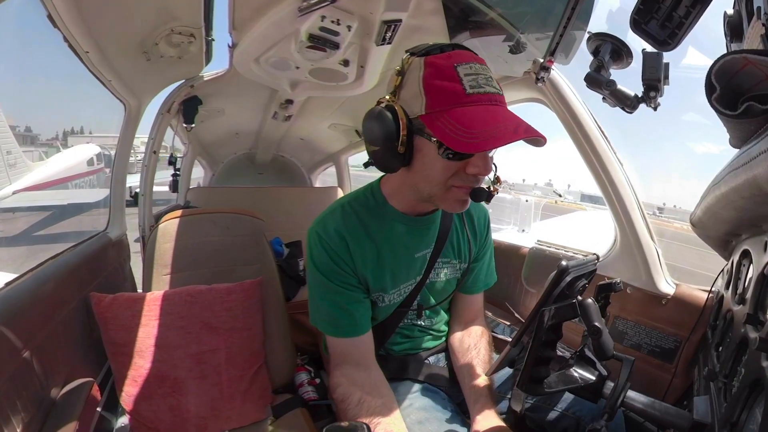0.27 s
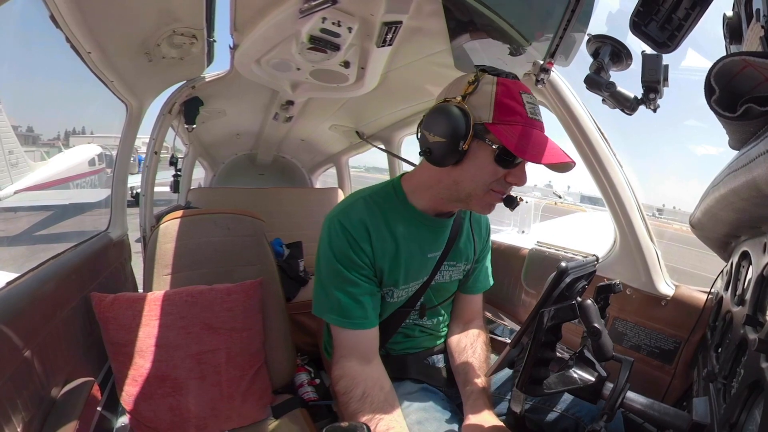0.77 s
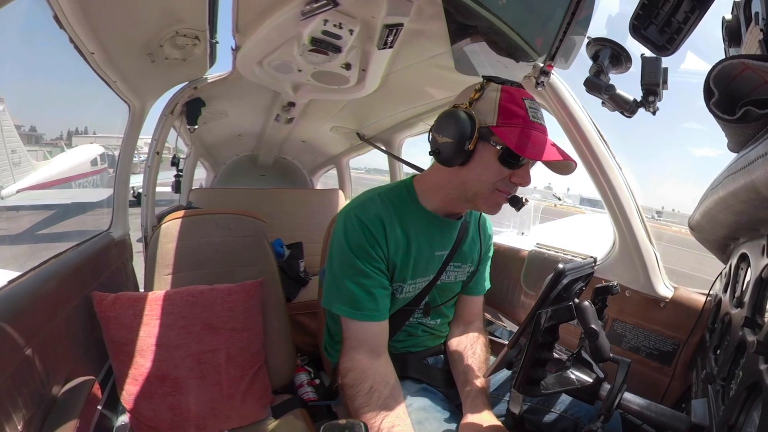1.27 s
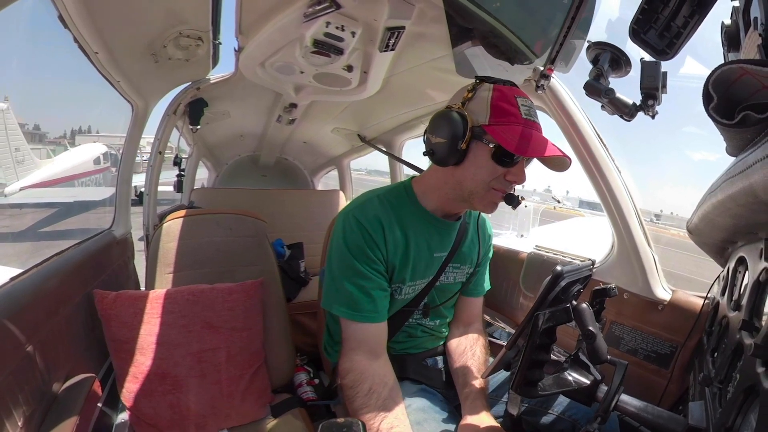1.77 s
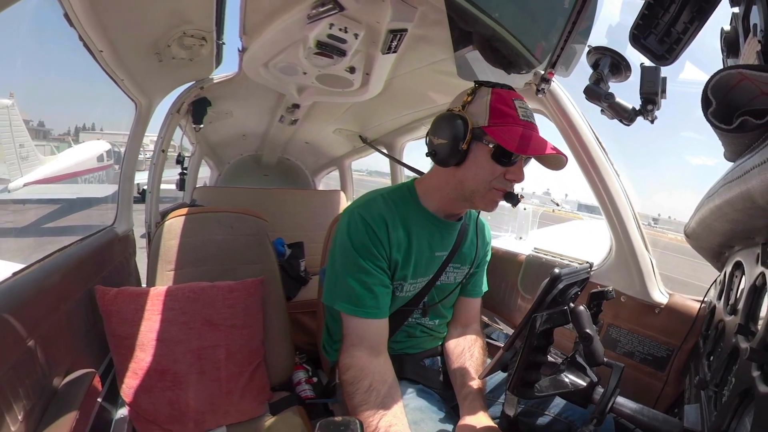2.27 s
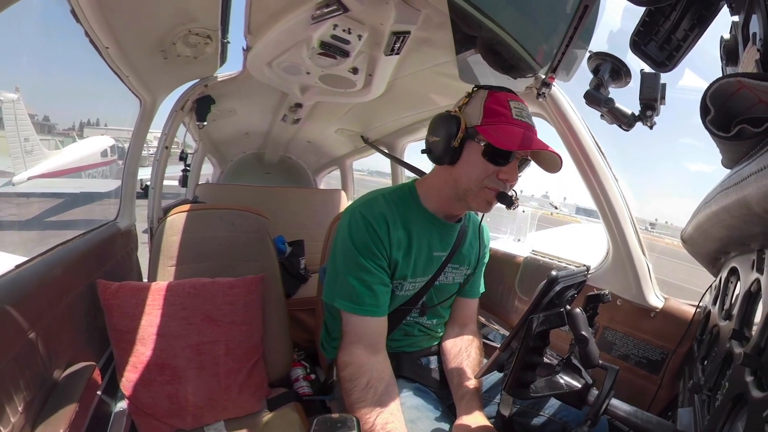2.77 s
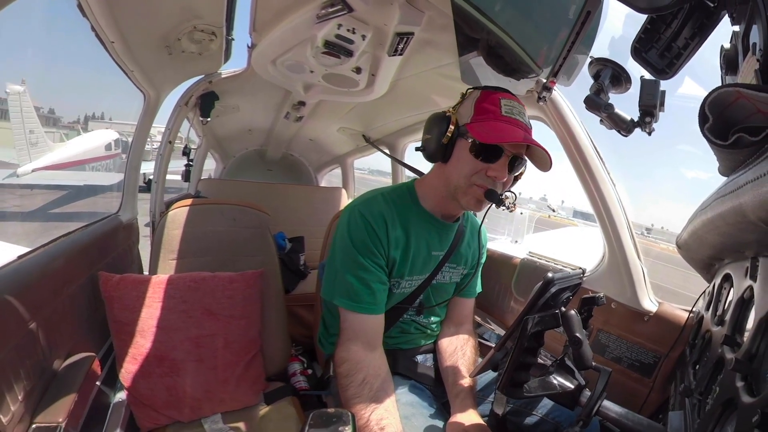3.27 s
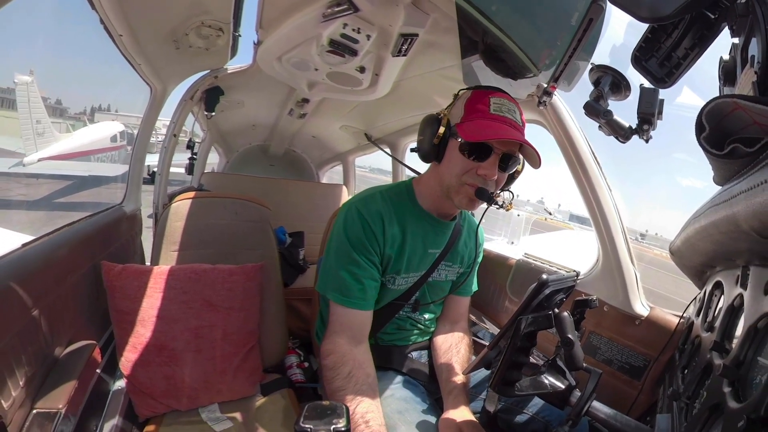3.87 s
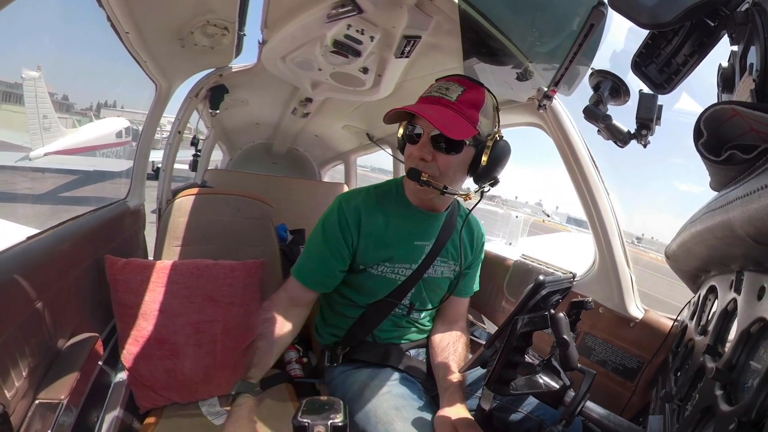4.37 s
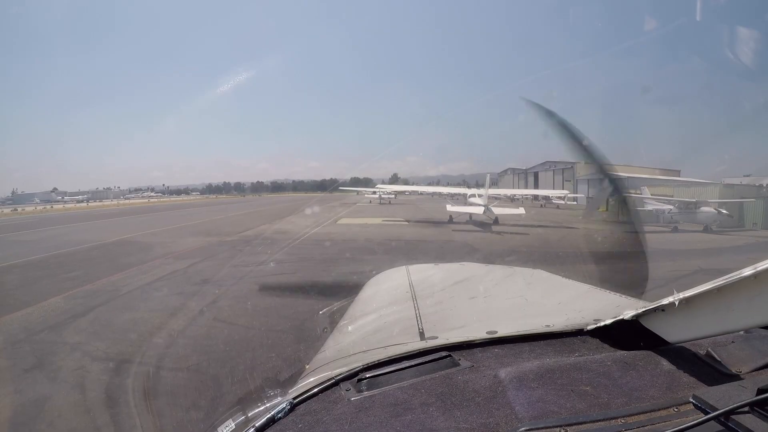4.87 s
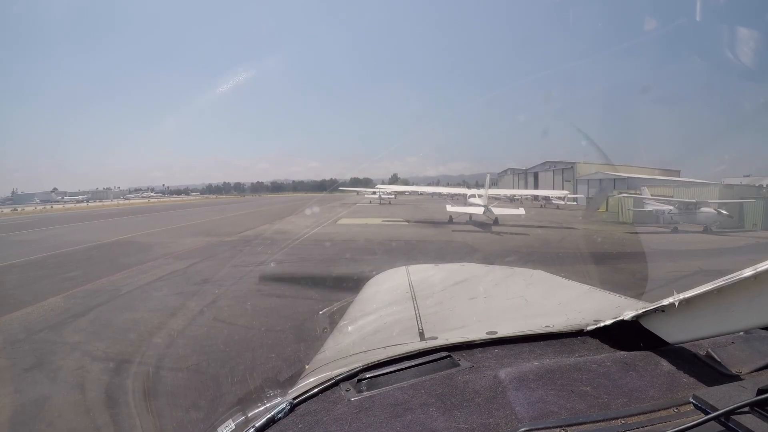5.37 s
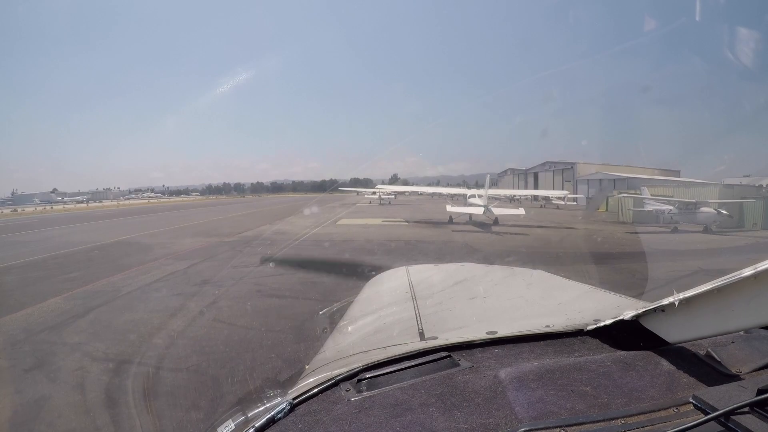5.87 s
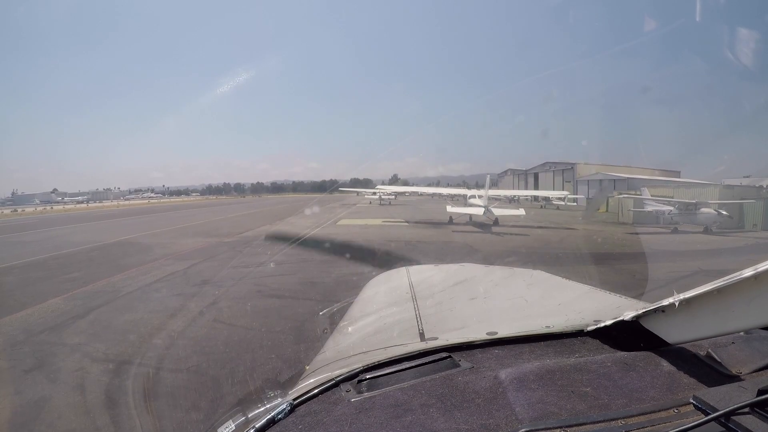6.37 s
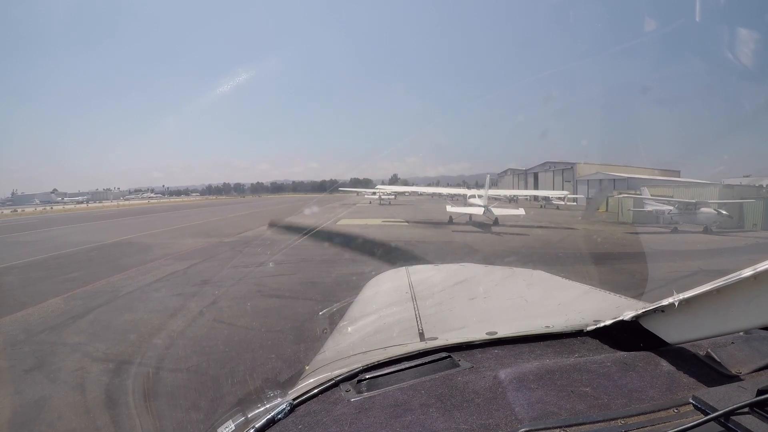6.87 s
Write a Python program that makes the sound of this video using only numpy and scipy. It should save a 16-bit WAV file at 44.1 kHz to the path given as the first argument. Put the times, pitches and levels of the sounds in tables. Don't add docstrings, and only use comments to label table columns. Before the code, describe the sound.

From 0 s a small four-cylinder aircraft engine is already running, heard inside the tight cabin by an overloaded microphone. Around 45 firings a second blend into a rough, fluttering drone: deep bass boom, midrange panel roar, hollow metallic ringing and low propeller buffeting. A thin high hiss pulses once per turn, about 21 times a second. A tiny skip comes at 1.2 s; from then to about 2.7 s the speed sinks slightly into a lumpy idle, its bass wavering. A brief gap interrupts at 3.2 s and a longer dropout at 4.24 s, returning instantly. From about 4.9 s a gusty, breathy draught rises, with a faint tick near 5.2 s and slightly duller treble. At 5.7 s an abrupt cut makes everything louder and slightly faster, with strong rattling and a small click near 6.15 s. Draught and rattle ease after 6.9 s; it ends abruptly around 7.1 s.

```python
import sys
import numpy as np
from scipy import signal
from scipy.fft import rfft, irfft, next_fast_len
from scipy.io import wavfile
from scipy.ndimage import uniform_filter1d, map_coordinates

SR = 44100
rng = np.random.default_rng(int(sys.argv[2]) if len(sys.argv) > 2 else 0)


def gain_from_decibels(decibels):
    exponent = np.asarray(decibels, float) / 20
    return 10 ** exponent


def transcribe(signal):
    frames = np.atleast_2d(signal).T
    limited = np.clip(frames, -1, 1)
    pcm = np.round(limited * 32767).astype(np.int16)
    wavfile.write(sys.argv[1], SR, pcm)


N = 313551

# start_s, speed_rpm
SHAFT_SPEED = [(0.0, 1375.9), (0.6, 1387.1), (1.2, 1384.0), (1.8, 1300.7), (2.7, 1266.7), (3.0, 1254.2),
               (4.2, 1250.5), (4.5, 1258.0), (4.8, 1250.3), (5.1, 1262.6), (5.4, 1252.9), (5.7, 1288.7),
               (6.3, 1283.2), (6.6, 1290.6), (7.11, 1280.8)]
# start_s, silence_s, fade_in_s, skipped_turns, cut_swing (sample value), return_swing (sample value)
JUMPS = [
    (1.18095, .0015, .004, .0375, -.17, 0),
    (3.18295, .006, .006, .0125, .5, 0),
    (4.23865, .0213, .0001, -.4325, .3, .36),
    (5.68545, -1, .0001, .4475, 0, 0),
]
ORDER_LEADS = [
    (1, .45, -.1),
    (2, .27, -.22),
    (4, 0, 0),
    (6, -.02, .12),
]
# shaft_order, level_db (over the wash)
WEAK_ORDERS = [(3, 2.5), (5, -13.5), (7, -12.5), (8, -10), (9, -13), (10, -7), (11, -15.5), (12, -12.5),
               (14, -19.5)]
# pitch_hz, level_db (per Hz)
WASH_COLOUR = [(30, -29.5), (50, -1), (70, -10), (110, -9.5), (150, -8), (190, -13.5), (240, -18.5),
               (330, -30), (600, -63), (1200, -120)]
# pitch_hz, level_db (per Hz)
ROAR_COLOUR = [(140, -27.5), (240, -2), (340, 0.5), (450, 1), (600, -5), (830, -3), (1200, -11.5),
               (1600, -15), (2100, -20), (2700, -22), (3300, -26), (3900, -31), (4600, -41), (7000, -100)]
# pitch_hz, level_db (per Hz)
HISS_COLOUR = [(2500, -40), (3800, -14), (4400, -11), (4900, -4), (5500, 0), (6400, -5), (7300, -6),
               (7900, -12), (8600, -19.5), (10000, -22.5), (11000, -19), (13000, -19), (15000, -22)]
# pitch_hz, width_hz, level_db
PANEL_MODES = [(626, 82, -2.5), (924, 39, -3), (1075, 17, -3.5), (1332, 72, -4.5), (1700, 17, -12),
               (1897, 60, -3), (2800, 640, -14)]
CYLINDER_DB = [-.8, 0, .8, -.3]
# pitch_hz, width_hz, level_db, shaft_angle_turns, sharpness (ratio)
WHISTLE_BANDS = [
    (14500, 1000, -4, .19, .95),
    (13600, 1000, -3.5, .25, .85),
    (12600, 1000, -2, .36, .4),
    (12000, 900, 0, .46, .35),
]
# pitch_hz, level_db (per Hz)
DRAUGHT_COLOUR = [(150, -42), (400, 6.5), (1200, 0.5), (2500, 4.5), (3400, -9), (4300, 4), (5200, -1),
                  (7000, -11), (9000, -29), (12000, -47)]
# pitch_hz, level_db, shaft_angle_turns, beat_depth_db
RINGING_PANELS = [
    (822, 0, 1.2, 3.8),
    (610, -7, 1.05, 4),
    (690, -12, .5, 3),
    (1070, -17, 1.6, 2),
    (1580, -19, 1.3, 3),
]
# pitch_hz, level_db (per Hz)
BUFFET_COLOUR = [(4, -16), (12, -4), (20, 0), (32, 0), (42, -8), (60, -40), (120, -120)]
# start_s, vent_opening (0-1), panel_rattle_db
CABIN_STATE = [(0, 0.15, -0.5), (.9, 0.16, 2), (1.3, 0.1, 1), (1.8, 0, 0), (3.1, 0.08, 2), (3.7, 0.1, -1),
               (4.2, 0.11, 0.5), (4.55, .05, -1), (4.85, 0.45, -2), (5.15, 0.91, 3), (5.45, 0.98, 6),
               (5.68, 1, 5), (5.9, 0.9, 8), (6.15, .8, 5.5), (6.5, 0.94, 4.5), (6.9, 0.5, -1.5),
               (7.11, 0.5, -6)]
# idle_db, faster_db (per 100 rpm), vent_db (fully open), louder_db (once the scene changes)
ORDER_LEVELS = [
    (-19, 1, 2, 3),
    (-21, 4, 2.5, 4.5),
    (-15.5, -4.5, .5, 3.5),
    (-21.5, -2, -.5, 7),
]
WASH_LEVEL = (-31.5, 2.5, 3, 4)
ROAR_LEVEL = (-31.5, 1, 4.5, 2.5)
HISS_LEVEL = (-55.5, 1.5, 0.8, 4.5)
WHISTLE_LEVEL = (-59.5, -2.5, -3, 4)
DRAUGHT_LEVEL = (-75.5, 0, 27.5, 2)
RING_LEVEL = (-36.5, -0.2, .1, 1.2)
# centre_s, firing_order_db, shaft_order_db
GUST_LURCHES = [(.05, -11.5, 3.5), (.75, 0.5, -11), (1.2, 0, 2.5), (1.8, 7, -6.5), (2.05, -7, 8),
                (2.4, -3, 4), (2.8, 6.5, -11), (3.2, -2, 1), (3.6, 3.5, -2), (4.15, 7, -7), (4.4, -4.5, 3),
                (4.65, 7.5, -8), (4.85, 0, 2), (5.05, 2.5, -7), (5.74, 4, -3), (5.95, 0, 4.5),
                (6.15, -6, 2.5), (6.45, 3.5, 0), (6.7, 3, 1.5), (7, 4, -11)]
# centre_s, order_4_db, order_6_db
BOOM_SWAYS = [(.1, 2, -4.5), (.6, 1.5, -15), (1.7, -1.5, 1.5), (2.6, 1, 1.5), (3.2, 0, 4), (4.2, .5, -6.5),
              (5, 2.5, -3.5), (5.2, -1.5, 2), (5.42, 0, -5), (5.62, 4, 3), (5.8, 2.5, 1), (5.95, 1, 3),
              (6.55, -3.5, -4), (6.72, -3.5, -1), (7.1, 0, 1.5)]
# start_s, peak_db
FITTING_TICKS = [
    (5.2344, -32),
    (6.157, -29),
]
# start_s, end_s (of its onset)
MUFFLE_ONSET = (5.15, 5.3)


def unit(x):
    return x / np.sqrt(np.mean(x ** 2) + 1e-20)


def curves(rows):
    s, *cols = np.transpose(rows)
    return [np.interp(np.arange(N) / SR, s, c) for c in cols]


def swells(rows, width_s):
    t = np.arange(0, N + 64, 64) / SR
    s, *cols = np.transpose(rows)
    bells = np.exp(-.5 * ((t[:, None] - s) / width_s) ** 2)
    return [np.interp(np.arange(N) / SR, t, bells @ c) for c in cols]


def wobble(rate):
    coarse = np.arange(0, N + 16, 16)
    knots = rng.standard_normal(int(N * rate / SR) + 4)
    return np.interp(np.arange(N), coarse, map_coordinates(knots, [coarse * rate / SR]))


def filtered(x, response):
    m = next_fast_len(N + 8192)
    spectrum = rfft(x, m) * response(np.fft.rfftfreq(m, 1 / SR))
    return unit(irfft(spectrum, m)[:N])


def colour(points):
    f, db = np.transpose(points)
    return lambda hz: gain_from_decibels(np.interp(np.log(hz + 1), np.log(f + 1), db))


def mode(hz, centre_hz, width_hz):
    return 1j * hz * width_hz / (centre_hz ** 2 - hz ** 2 + 1j * hz * width_hz)


def level(law):
    idle_db, faster_db, vent_db, louder_db = law
    rpm, = curves(SHAFT_SPEED)
    vent_opening = curves(CABIN_STATE)[0]
    changed = np.arange(N) / SR > JUMPS[-1][0]
    return idle_db + faster_db * (rpm - 1260) / 100 + vent_db * vent_opening + louder_db * changed


def muffle():
    t = np.arange(N) / SR
    return np.interp(t, MUFFLE_ONSET, [0, -3]) * (t <= JUMPS[-1][0])


def crank():
    rpm, = curves(SHAFT_SPEED)
    turns = np.cumsum(rpm) / 60 / SR - .0325
    skips = sum(skip * (np.arange(N) / SR > s) for s, _, _, skip, *_ in JUMPS)
    return rpm, turns + skips


def boom(rpm, turns):
    firing_db, shaft_db = swells(GUST_LURCHES, .12)
    sways_db = swells(BOOM_SWAYS, 0.071)
    changes_db = [shaft_db, firing_db, *sways_db]
    tones = 0
    for (order, lead, drift), law, change_db, waver in zip(
            ORDER_LEADS, ORDER_LEVELS, changes_db, [0.075, 0.07, 0.036, 0.05]):
        angle = order * turns + lead + drift * (rpm - 1260) / 100 + waver * wobble(11)
        db = level(law) + change_db + 2.5 + 23.2 * waver * wobble(7)
        tones = tones + gain_from_decibels(db) * np.cos(2 * np.pi * angle)

    buffet = filtered(rng.standard_normal(N), colour(BUFFET_COLOUR))
    tones = tones + gain_from_decibels(level(ORDER_LEVELS[0]) + .4 * shaft_db - 3) * buffet

    wash_db = level(WASH_LEVEL)
    for order, db in WEAK_ORDERS:
        angle = order * turns - .4 + 0.071 * wobble(4.5)
        tones = tones + gain_from_decibels(wash_db + db + 2 * wobble(5)) * np.cos(2 * np.pi * angle)

    join = round(JUMPS[-1][0] * SR) + 1
    step = tones[join + 1] - tones[join - 2] + .09
    offset = np.arange(N) - join
    return tones - step * np.exp(-np.abs(offset) / 90) * np.sign(offset + .5) / 2


def puffs(turns, fall_db, scatter_db):
    firing = 2 * turns + 8.3
    number = firing.astype(int)
    size_db = np.array(CYLINDER_DB)[number % 4] + scatter_db * rng.standard_normal(400)[number]
    return uniform_filter1d(gain_from_decibels(size_db - fall_db * (firing - number)), size=160)


def panel_roar(turns):
    shake = puffs(turns, fall_db=1.5, scatter_db=.8) * gain_from_decibels(1.3 * wobble(150)) * rng.standard_normal(N)

    def response(hz):
        modes = sum(gain_from_decibels(db) * mode(hz, c, w) for c, w, db in PANEL_MODES)
        return colour(ROAR_COLOUR)(hz) * (1 + modes)

    return gain_from_decibels(level(ROAR_LEVEL) - 2.5) * filtered(shake, response)


def panel_ring(rpm, turns):
    t, ring = np.arange(N) / SR, 0
    uneven = 1 - (rpm - 1260) / 260
    for hz, db, angle, beat_db in RINGING_PANELS:
        turn = (turns - angle + 2.5).astype(int)
        start = uniform_filter1d(np.exp(2j * np.pi * rng.random(200))[turn], size=300)
        tone = np.real(start * np.exp(2j * np.pi * (hz * t + .13 * wobble(90))))
        once_a_cycle = uneven * np.cos(np.pi * (turns - angle))
        once_a_turn = .75 * np.cos(2 * np.pi * (turns - angle))
        size_db = beat_db * (1 + .15 * wobble(3)) * (once_a_cycle + once_a_turn)
        size_db = size_db + 2.2 * wobble(80) + .5 * wobble(14)
        ring = ring + gain_from_decibels(db) * unit(gain_from_decibels(size_db) * tone)
    rattle_db = curves(CABIN_STATE)[1]
    return gain_from_decibels(level(RING_LEVEL) + rattle_db - 1) * ring


def propeller_wash():
    wash = filtered(gain_from_decibels(wobble(9.5)) * rng.standard_normal(N), colour(WASH_COLOUR))
    return gain_from_decibels(level(WASH_LEVEL) + 7) * wash


def whistle(turns):
    air = 0
    for hz, width_hz, db, angle, sharp in WHISTLE_BANDS:
        gate = np.exp(sharp * np.cos(2 * np.pi * (turns - angle)))
        gate = gate * gain_from_decibels(2.5 * wobble(200) + 1.5 * wobble(25))
        band = filtered(gate * rng.standard_normal(N), lambda f: mode(f, hz, width_hz) ** 2)
        air = air + gain_from_decibels(db + 2 * sharp * muffle()) * band
    return gain_from_decibels(level(WHISTLE_LEVEL) - 1.0) * unit(air)


def ticks():
    out, t = np.zeros(N), np.arange(2048) / SR
    t60_s = .012
    for s, db in FITTING_TICKS:
        click = uniform_filter1d(rng.standard_normal(len(t)), size=6)
        out[round(s * SR):][:len(t)] += gain_from_decibels(db - 7 - 60 * t / t60_s) * click
    return out


def air_hiss(turns):
    throb_db = .6 * np.cos(4 * np.pi * turns) + .6 * wobble(25) + wobble(300)
    air = filtered(gain_from_decibels(throb_db) * rng.standard_normal(N), colour(HISS_COLOUR))
    return gain_from_decibels(level(HISS_LEVEL) + 1.5 + .5 * muffle()) * air


def draught():
    gusts_db = .8 * wobble(18) + wobble(150)
    air = filtered(gain_from_decibels(gusts_db) * rng.standard_normal(N), colour(DRAUGHT_COLOUR))
    return gain_from_decibels(level(DRAUGHT_LEVEL)) * air


def scene():
    rpm, turns = crank()
    engine = boom(rpm, turns) + panel_roar(turns) + panel_ring(rpm, turns)
    air = propeller_wash() + whistle(turns) + air_hiss(turns) + draught()
    return (engine + air + ticks())[None]


def top_cut(x):
    return signal.sosfilt(signal.butter(12, 15750, fs=SR, output="sos"), x)


def record(dry):
    size = np.sqrt(np.mean(dry ** 2))
    x = size * filtered(dry[0], colour([(14700, 0), (15100, -6), (15500, -40)]))
    x = np.clip(x, -.995, .995)
    t = np.arange(N) / SR

    def near(s):
        return np.exp(-((t - s) / .003) ** 2)

    for s, silence, fade, _, cut, resume in JUMPS[:-1]:
        back_s = s + silence
        x = x + (cut - x[int(s * SR)]) * near(s) * (t <= s)
        x = x + (resume - x[int(back_s * SR) + 1]) * near(back_s) * (t > s)
        rise = np.clip((t - s - silence) / fade, 0, 1)
        x = x * np.where(t > s, rise * rise, 1)
    return top_cut(x[None])


dry = scene()
out = record(dry)
transcribe(out)
```